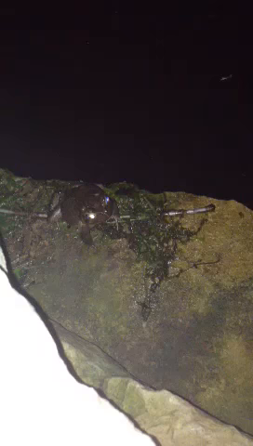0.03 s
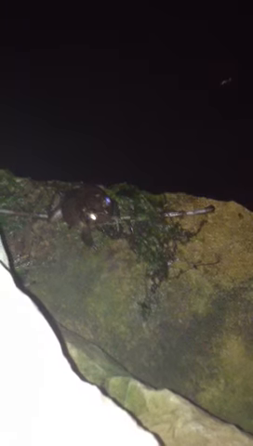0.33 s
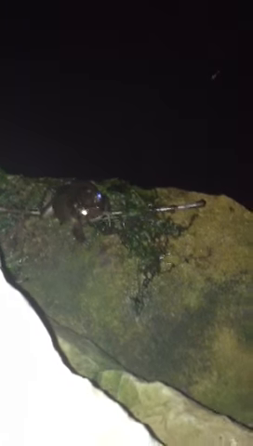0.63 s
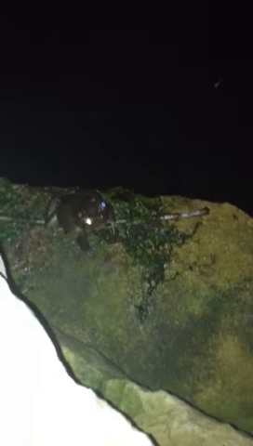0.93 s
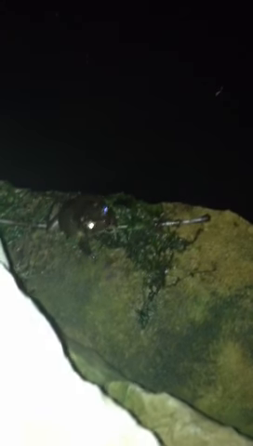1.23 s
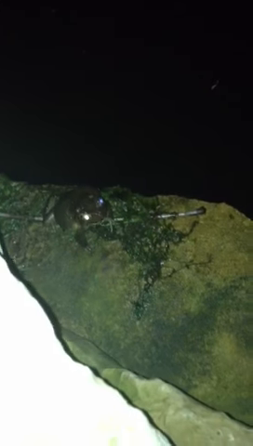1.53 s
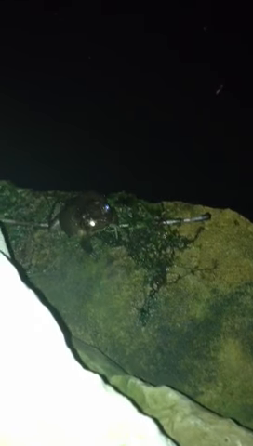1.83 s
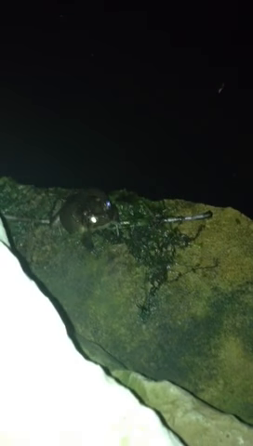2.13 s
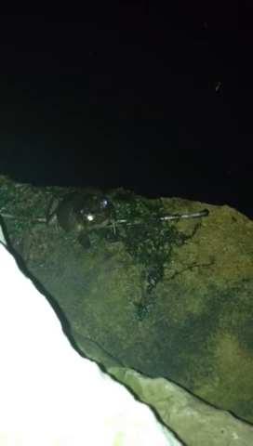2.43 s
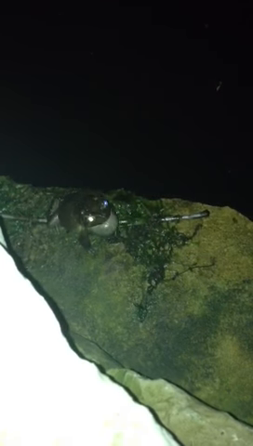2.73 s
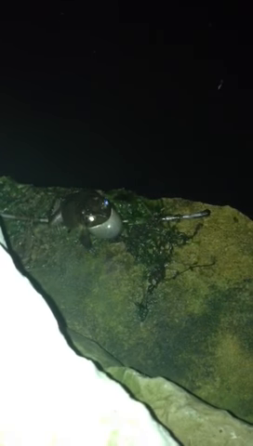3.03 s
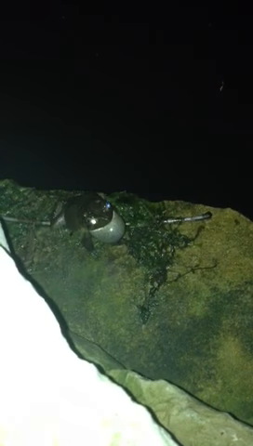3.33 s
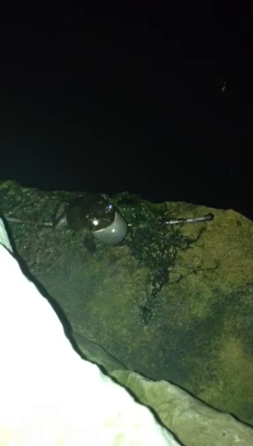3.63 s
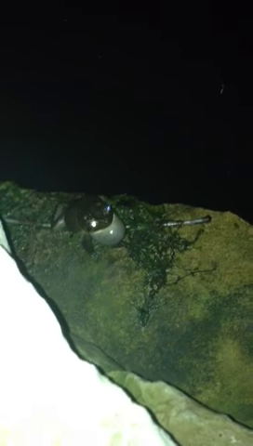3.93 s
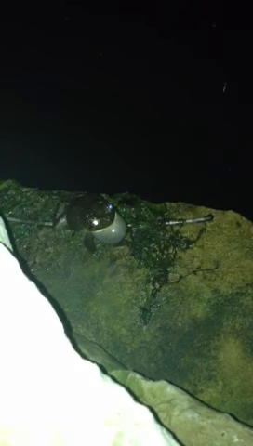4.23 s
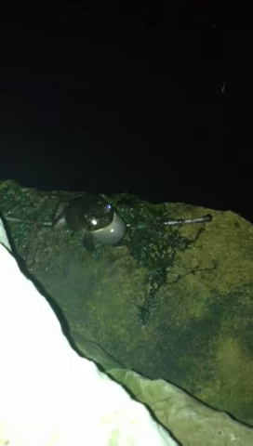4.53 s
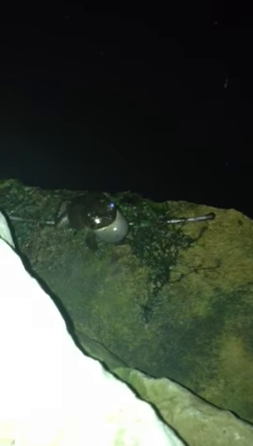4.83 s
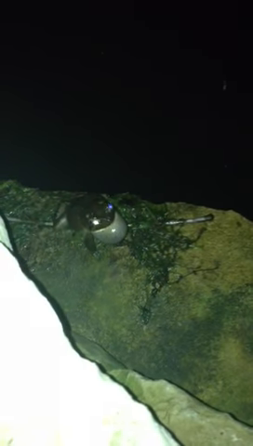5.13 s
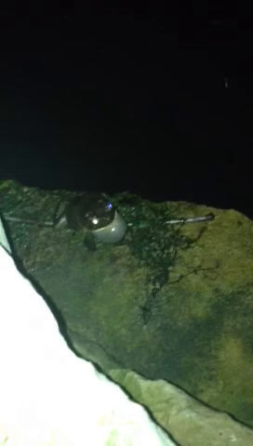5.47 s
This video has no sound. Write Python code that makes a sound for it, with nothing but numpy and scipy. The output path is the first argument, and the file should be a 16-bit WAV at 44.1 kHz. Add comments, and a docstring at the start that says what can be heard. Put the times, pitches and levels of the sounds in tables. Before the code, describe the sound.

After faint outdoor hiss, three tree frogs overlap in raspy croaks, giving way to one close frog's clean, sustained trill.

```python
"""Four tree frogs call at night beside a pool. Three croak across each other in buzzy trains of
rising pulses; then the nearest, on a stone rim, inflates its throat sac and holds a clean trill.
Each pulse is a puff of air that vibrates the vocal cords; the sac radiates the sound.
Stone reflects the calls, over a faint outdoor hiss, a brief rumble and two soft rustles."""
import sys
import numpy as np
from scipy import signal
from scipy.fft import rfft, irfft, next_fast_len
from scipy.io import wavfile
from scipy.ndimage import uniform_filter1d, minimum_filter1d

SR = 44100
rng = np.random.default_rng(int(sys.argv[2]) if len(sys.argv) > 2 else 0)


def store_pcm(level_fs):
    """Save levels as 16-bit WAV."""
    pcm = np.round(np.clip(level_fs, -1, 1) * 32767).astype(np.int16)
    wavfile.write(sys.argv[1], SR, np.atleast_2d(pcm).T)


N = 246959


def croaks(rasp_db=-31.5, sac_cut_hz=740):
    """Three frogs at slightly different paces: pulses slide through each other and reflect off stone."""
    # Per frog (lead, deep, thin): (start [s], end [s], settled rate [1/s], initial extra rate [1/s],
    # settling [s], rate lost at end [1/s])
    paces = [(1.6278, 2.767, 35.06, 3.75, .1755, 2.79), (1.7771, 2.615, 36.11, 5.71, .0773, 2.87),
             (2.1683, 3.116, 37.39, .975, .526, 4.06)]
    # Per frog: (level [dB], pitch [Hz], fundamental [dB], fundamental before swell [dB],
    # overtones before swell [dB], climax push [dB])
    voices = [(-11.8, 1266, -.1, -33, -16, .7), (-15.1, 1033, 1, 1, -13.7, 1.3),
              (-15.0, 1282, -.9, 0, 0, 2.8)]
    # Pulse per frog: (fundamental peak [s], overtone peak [s], rise [s], fall [s],
    # upward glide [share of pitch], glide time [s])
    pulses = [(0, -.0021, .00345, .0037, .25, .014), (0, .00085, .00315, .0034, .117, .0046),
              (.0012, 0, .0028, .0008, .08, .0055)]
    # Unevenness per frog: (pitch scatter [share], level scatter [dB], roughness [share])
    scatters = [(.012, .5, .02), (.013, 1.6, .028), (.008, 1.0, .02)]
    # Harmonics from the 2nd up: (level [dB])
    lead_db = [1.5, -21.5, -31.5, -47, -69.5, -53]
    deep_db = [0.5, -12, -49.5, -42.5, -40, -33.5, -44.5]
    thin_db = [-3.5, -17, -36, -31, -47, -28]
    # Air through the throats: (frequency [Hz], level [dB])
    rasp_colour = [(300, -42), (900, -13.5), (3300, -5.5), (4300, 3), (5500, -7.5), (8300, 0),
                   (10500, -17.5), (11800, -19), (15000, -32)]
    # Throat response: (frequency [Hz], gain [dB])
    throat_colour = [(770, -1.5), (900, 0), (1250, 1), (1480, 2.5), (1680, -5.5), (1820, 1), (2550, -0.5),
                     (2750, -3.5), (2920, -11), (3150, -0.5), (3950, 1.5), (4300, -3), (4750, 4.5),
                     (5500, 0)]
    # Stone reflections: (delay [s], gain [dB])
    stones = [(.0021, -24.5), (.0036, -14), (.0053, -22.5), (.0071, -12.5), (0.0122, -19)]
    frogs = zip(paces, voices, pulses, scatters, [lead_db, deep_db, thin_db])
    fundamental, overtones, flow = np.sum([croak_pulses(*frog) for frog in frogs], axis=0)
    calls = fundamental + overtones + amp(rasp_db) * flow * noise(rasp_colour)
    radiation = lambda hz: hz ** 8 / np.hypot(hz ** 8, sac_cut_hz ** 8)  # small sacs radiate no bass
    reflections = lambda hz: 1 + sum(amp(db) * delay(hz, s) for s, db in stones)
    return filtered(calls, lambda hz: amp(along(throat_colour, hz)) * radiation(hz) * reflections(hz))


def croak_pulses(pace, voice, pulse, scatter, harmonics_db):
    """One frog's upward chirps; effort sets level, brightness, pitch and length."""
    level_db, pitch_hz, sac_db, shut_db, soft_db, push_db = voice
    low_peak_s, high_peak_s, rise_s, fall_s, glide, glide_s = pulse
    swell_at_s, sac_open_s, swell_s = 1.784, .03, .092  # sac fills first, overtones follow
    climax_at_s, climax_s = 2.36, .106
    times, index, t = pulse_grid(pace, jitter_s=.0001)
    before_swell = lambda s: np.clip(1 - (times - swell_at_s) / s, 0, 1)
    onset_db = -8.8 * np.exp(-(times - pace[0]) / .028)  # weak first pulses
    effort_db = onset_db + soft_db * before_swell(swell_s)
    climax_db = push_db * hump(times - climax_at_s, climax_s, climax_s)
    stretch = np.exp(.0185 * effort_db - .12 * climax_db)  # weak and pushed pulses are both short
    chirp = np.maximum(1 + glide * (1 - np.exp(-t / glide_s)), .5)
    hz = pitch_hz * (1 + .0022 * effort_db) * chirp  # weak pulses are flat
    low_db = level_db + climax_db + onset_db + sac_db + shut_db * before_swell(sac_open_s)
    low = amp(low_db) * hump(t / stretch - low_peak_s, rise_s, fall_s)
    high = amp(level_db + climax_db + effort_db) * hump(t / stretch - high_peak_s, rise_s, fall_s)
    # weak pulses keep some upper harmonics
    edged_db = [db - .28 * effort_db * (order > 2) for order, db in enumerate(harmonics_db, 2)]
    return larynx(index, t, hz, low, high, edged_db, *scatter)


def trill(sac_hz=1700, sac_width_hz=54, direct_db=-2, air_db=-49):
    """The taut sac rings just under the pitch and beats with it: each pulse has a smaller second lobe."""
    # Throat resonances: (centre [Hz], width [Hz], gain [dB])
    modes = [(2977, 73, 20), (5860, 100, 9.5), (9970, 48, 20)]
    # Air through the throat: (frequency [Hz], level [dB])
    air_colour = [(40, -45.5), (300, -23), (1200, 26.5), (2000, -11), (2450, -21.5), (3100, 15),
                  (4000, 4.5), (4700, 13), (8500, -21), (11000, -28.5), (15000, -22)]
    fundamental, overtones, flow = trill_pulses()
    sac = lambda hz: amp(direct_db) + resonance(hz, sac_hz, sac_width_hz)
    rim = lambda hz: 1 - .3 * delay(hz, .00572)  # one close reflection
    throat = lambda hz: 1 + sum(amp(db) * resonance(hz, centre, width) for centre, width, db in modes)
    tone = filtered(fundamental, lambda hz: sac(hz) * rim(hz))
    buzz = filtered(overtones, throat)
    lingering = uniform_filter1d(flow, size=SR // 80, origin=SR // 250)  # hiss spills into the gaps
    return tone + buzz + amp(air_db) * (flow + 2 * lingering) * noise(air_colour)


def trill_pulses():
    """Arched pulses that grow higher, longer and purer as the sac inflates."""
    # (start [s], end [s], settled rate [1/s], initial extra rate [1/s], settling [s],
    # rate lost at end [1/s])
    pace = (2.8211, 5.599, 36.59, 6.457, .7735, 1.365)
    # Harmonics from the 2nd up: (level [dB])
    harmonics_db = [-44, -49, -36, -46, -52.5, -60.5, -61]
    scoop, scoop_lead_s, scoop_s, droop_s, sag_hz_per_s = .2, .0035, .0004, .023, 10
    buzz_lead_s, buzz_attack_s = .0045, .00028
    open_lead_s, attack_s, hold_s, release_s = .003, .00065, .0042, .0012
    flutter_share, flutter_s, flutter_fade_s = .08, .0095, .0009
    times, index, t = pulse_grid(pace, jitter_s=.00005)
    age_s = np.abs(times - pace[0])
    inflation = 1 - np.exp(-(age_s / .23) ** 1.5)
    follow = lambda slack, full: slack + (full - slack) * inflation
    # pitch scoops up as the cords open, droops after the centre
    arch = 1 - scoop * step(-(t + scoop_lead_s) / scoop_s) - inflation * (np.maximum(t, 0) / droop_s) ** 2
    hz = (follow(1545, 1805) - sag_hz_per_s * age_s) * arch
    # cords start to vibrate, open, hold, release, then flutter on
    shape_t = t / follow(.55, 1)
    buzz = step((shape_t + buzz_lead_s) / buzz_attack_s) * step((flutter_s - shape_t) / flutter_fade_s)
    swell = step((shape_t + open_lead_s) / attack_s) * step((hold_s - shape_t) / release_s)
    low = amp(follow(-28, -9.7)) * buzz * (flutter_share + (1 - flutter_share) * swell)
    fade_in_db = -24 * np.exp(-age_s / .065)
    high = amp(follow(-9, -8.8) + fade_in_db) * buzz
    # a slack sac favours the 4th harmonic
    voiced_db = [db + follow(13, .3) * (order == 4) for order, db in enumerate(harmonics_db, 2)]
    return larynx(index, t, hz, low, high, voiced_db, pitch_scatter=.002, scatter_db=.15, rough=.006)


def larynx(index, t, pitch_hz, low, high, harmonics_db, pitch_scatter, scatter_db, rough):
    """Puffs drive the cords: returns fundamental (envelope low), overtones and air flow (envelope high)."""
    chance = rng.standard_normal((len(t), 2))
    # cycle-to-cycle unevenness smears high overtones into rasp
    uneven = rough * unit(uniform_filter1d(rng.standard_normal(t.shape), size=30, axis=1))
    hz = pitch_hz * (1 + pitch_scatter * chance[:, [0]]) * (1 + uneven)
    # cords start from rest: nearly the same wave in every pulse
    cycles, centre = np.cumsum(hz, axis=1) / SR, [t.shape[1] // 2]
    phase = 2 * np.pi * (cycles - cycles[:, centre] + (hz * t)[:, centre])
    gain = signal.windows.tukey(t.shape[1], 1 / 4) * amp(scatter_db * chance[:, [1]])
    upper = sum(amp(db) * np.sin(order * phase) for order, db in enumerate(harmonics_db, 2))
    overlap_add = lambda pulses: np.bincount(index.ravel(), (gain * pulses).ravel(), N)[:N]
    return overlap_add(low * np.sin(phase)), overlap_add(high * upper), overlap_add(high)


def pulse_times(start_s, end_s, settled_hz, hurry_hz, settle_s, flag_hz, flag_s=.15):
    """A call starts hurried, settles, then flags; one pulse per whole count of the integrated rate."""
    t = np.arange(start_s, end_s, 1 / SR)
    rate_hz = settled_hz + hurry_hz / (1 + ((t - start_s) / settle_s) ** 3)
    rate_hz -= flag_hz * np.exp((t - end_s) / flag_s)
    count = np.cumsum(rate_hz) / SR
    return np.interp(np.arange(int(count[-1]) + 1), count, t)


def pulse_grid(pace, jitter_s):
    """One row per pulse: centre [s], sample indices, time from centre [s]."""
    times = pulse_times(*pace)[:, None]
    times = times + jitter_s * rng.standard_normal(times.shape)
    half = SR // 60
    index = np.round(times * SR).astype(int) + np.arange(-half, half)
    return times, index, index / SR - times


def surroundings(x):
    """Short diffuse reverberation, 10 ms late."""
    # Decay: (frequency [Hz], T60 [s])
    t60 = [(300, 0.1), (2000, 0.052), (10000, 0.12)]
    hz, t, spectrum = signal.stft(rng.standard_normal(SR // 3), SR, nperseg=256)
    tail = signal.istft(spectrum * amp(-60 * t / along(t60, hz)[:, None]), SR, nperseg=256)[1]
    return signal.fftconvolve(np.pad(x, (SR // 100, 0)), tail / np.linalg.norm(tail))[:N]


def night(hiss_db=-56):
    """Steady outdoor hiss, a brief low rumble early in the trill, faint rustles."""
    # Swells: (time [s], level [dB], width [s])
    rumbles = [(2.95, -60, .04), (3.005, -48, .022), (3.09, -50.5, .025)]
    rustles = [(3.755, -53.5, .045), (5.35, -54, .03)]
    # Spectra: (frequency [Hz], level [dB])
    hiss_colour = [(25, -46), (50, -27), (90, -11), (140, -.5), (200, .5), (310, -5), (700, -9.5),
                   (1650, -13.5), (2400, -12), (4700, -14), (8200, -15.5), (10100, -22), (15500, -23.5)]
    rumble_colour = [(20, -23.5), (60, -11.5), (120, -1.5), (190, -9), (350, -36), (1000, -76)]
    rustle_colour = [(100, -30.5), (300, -17), (470, 0), (700, -13.5), (2400, -35), (5000, -8), (9000, -24),
                     (15000, -31.5)]
    t = np.arange(N) / SR
    swells = lambda rows: sum(amp(db) * hump(t - s, width_s, width_s) for s, db, width_s in rows)
    hiss = amp(hiss_db) * noise(hiss_colour)
    return hiss + swells(rumbles) * noise(rumble_colour) + swells(rustles) * noise(rustle_colour)


def amp(db):
    """Decibels to gain."""
    return 10 ** (np.asarray(db) / 20)


def unit(x):
    """x at rms 1."""
    return x / np.sqrt(np.mean(x ** 2) + 1e-20)


def along(points, hz):
    """Interpolate (frequency [Hz], value) points on a log axis."""
    knots_hz, values = np.transpose(points)
    return np.interp(np.log(hz + 1), np.log(knots_hz + 1), values)


def filtered(x, response):
    """x through a complex frequency response."""
    size = next_fast_len(N + SR // 2)
    return irfft(rfft(x, size) * response(np.fft.rfftfreq(size, 1 / SR)), size)[:N]


def noise(colour):
    """Coloured noise, rms 1."""
    return unit(filtered(rng.standard_normal(N), lambda hz: amp(along(colour, hz))))


def delay(hz, s):
    """Response of a path s seconds longer."""
    return np.exp(-2j * np.pi * hz * s)


def resonance(hz, centre_hz, width_hz):
    """Response of one ringing mode."""
    return 1j * hz * width_hz / (centre_hz ** 2 - hz ** 2 + 1j * hz * width_hz)


def step(x):
    """Smooth rise from 0 to 1 around x = 0."""
    return .5 + .5 * np.tanh(x / 2)


def hump(t, rise_s, fall_s):
    """Asymmetric bell around t = 0."""
    return np.exp(-.5 * (t / np.where(t < 0, rise_s, fall_s)) ** 2)


def scene():
    """Frogs, reverberation and night air; the nearest frog is almost dry."""
    far, near = croaks(), trill()
    reverb = surroundings(amp(-12.7) * far + amp(-19) * near)
    return (far + near + reverb + night())[None]


def record(dry, open_s=.078, fade_s=.012, ceiling=.92, top_hz=15500):
    """Microphone opens after a moment; peak limiter, then band limit."""
    x = dry[0] * np.clip((np.arange(N) / SR - open_s) / fade_s, 0, 1)
    needed_gain = ceiling / np.maximum(np.abs(x), ceiling)
    gain = uniform_filter1d(minimum_filter1d(needed_gain, size=265), size=265)  # 6 ms hold and smoothing
    return filtered(x * gain, lambda hz: hz < top_hz)[None]


dry = scene()
out = record(dry)
store_pcm(out)
```